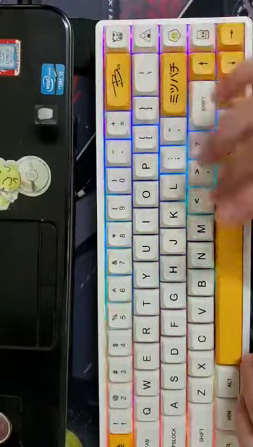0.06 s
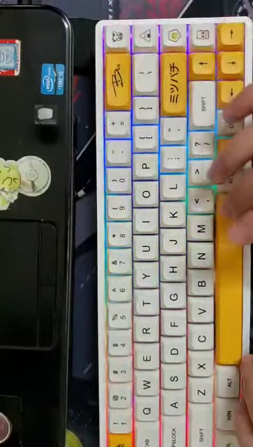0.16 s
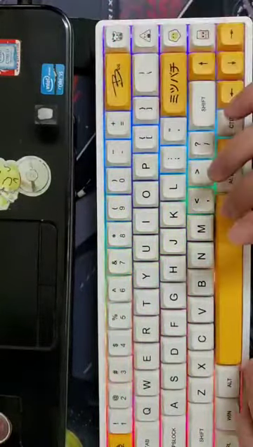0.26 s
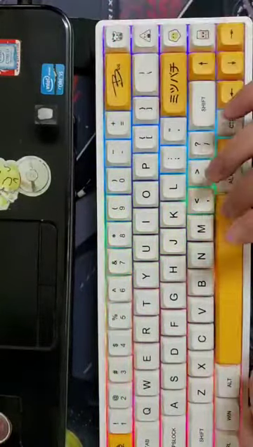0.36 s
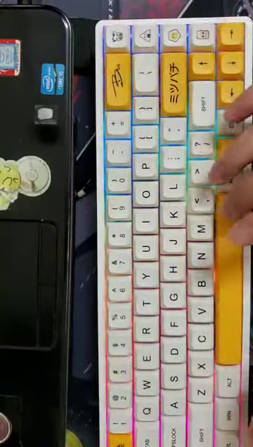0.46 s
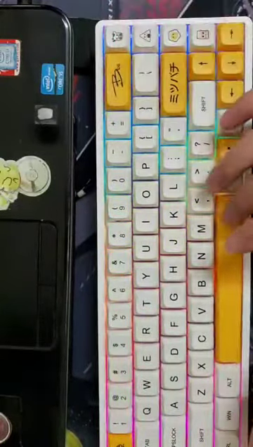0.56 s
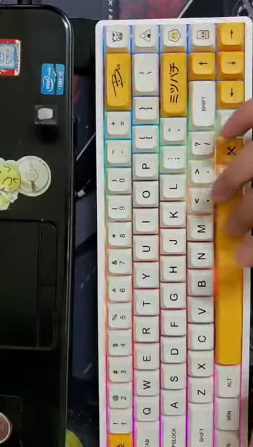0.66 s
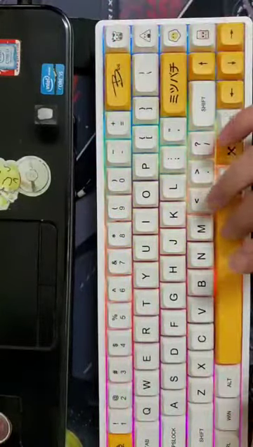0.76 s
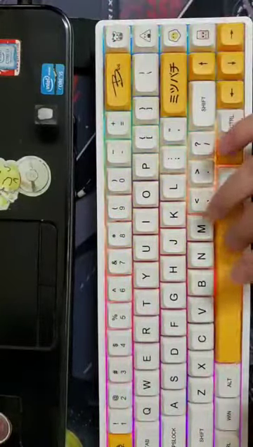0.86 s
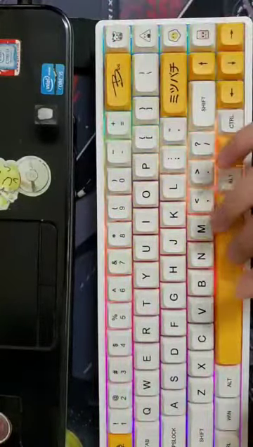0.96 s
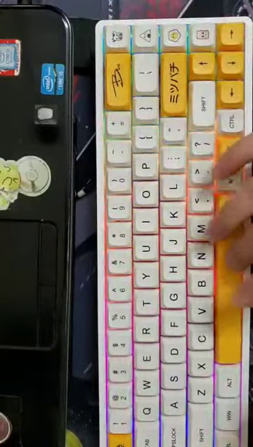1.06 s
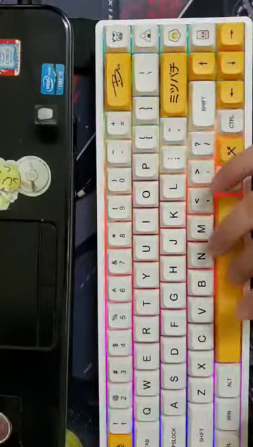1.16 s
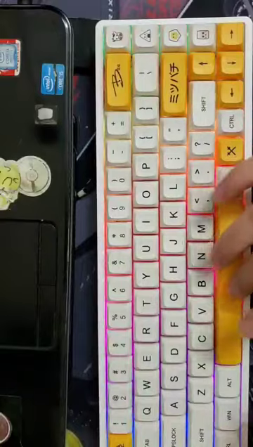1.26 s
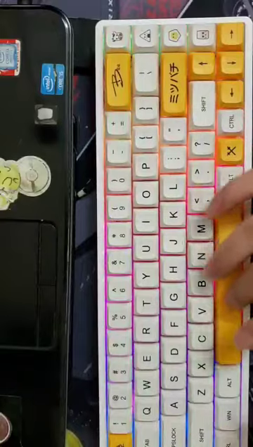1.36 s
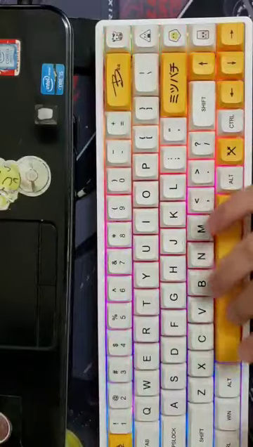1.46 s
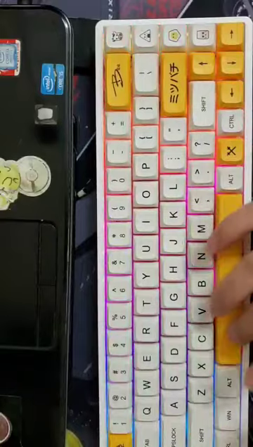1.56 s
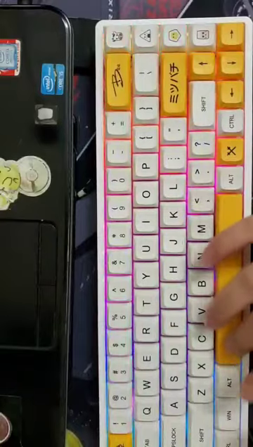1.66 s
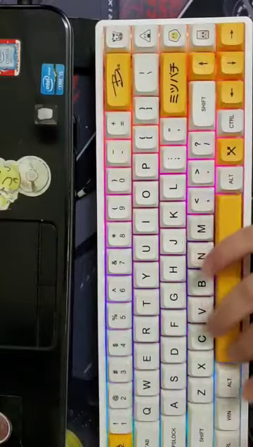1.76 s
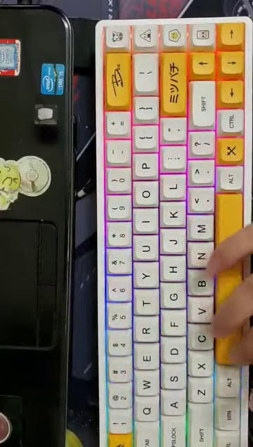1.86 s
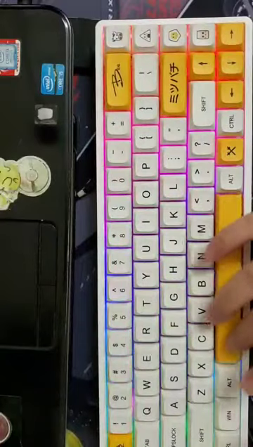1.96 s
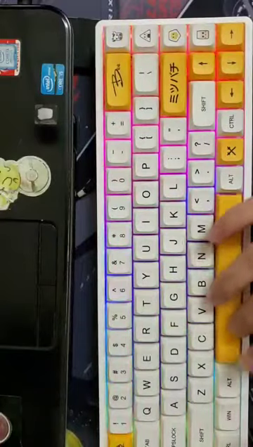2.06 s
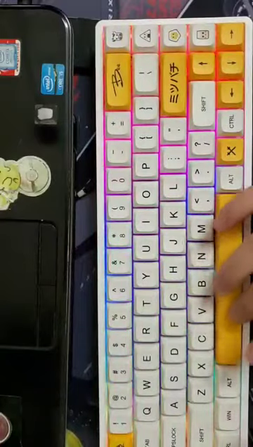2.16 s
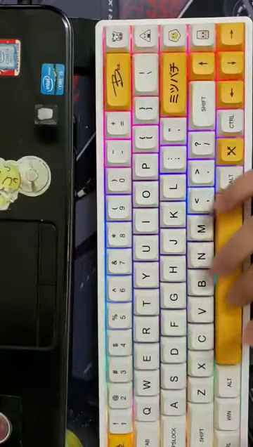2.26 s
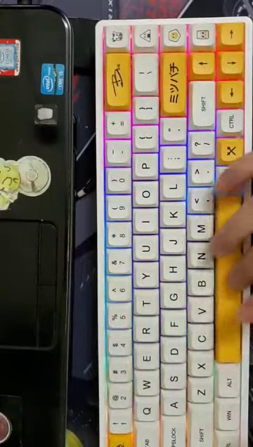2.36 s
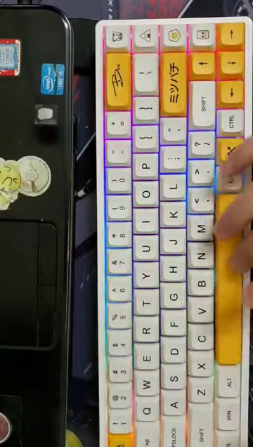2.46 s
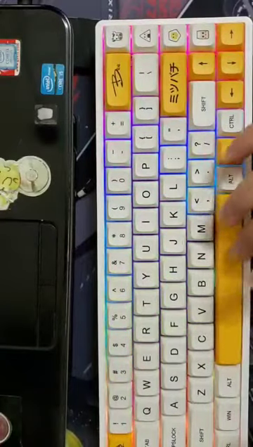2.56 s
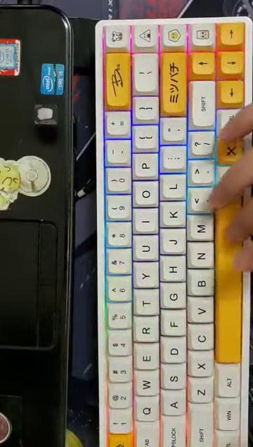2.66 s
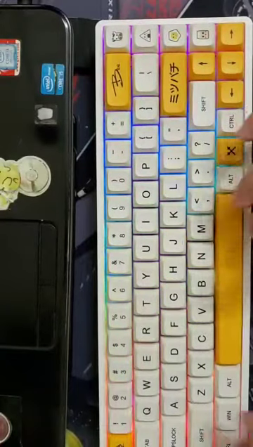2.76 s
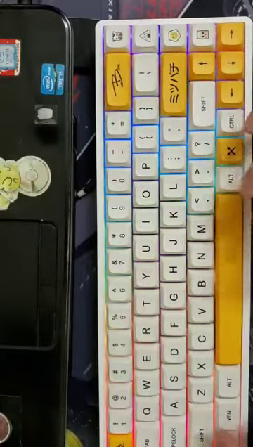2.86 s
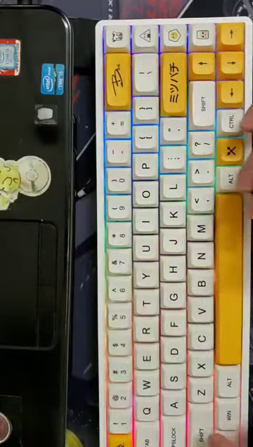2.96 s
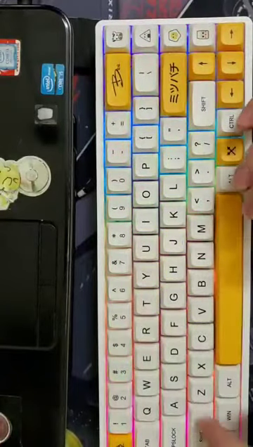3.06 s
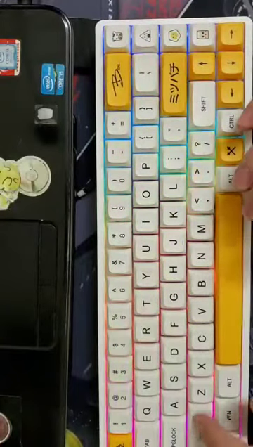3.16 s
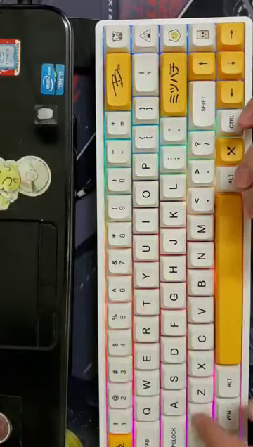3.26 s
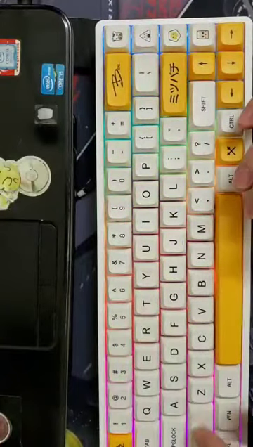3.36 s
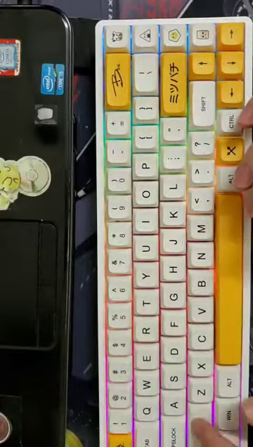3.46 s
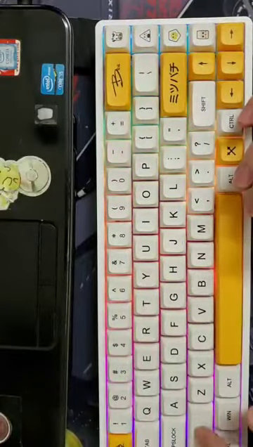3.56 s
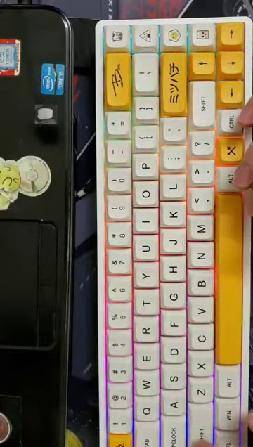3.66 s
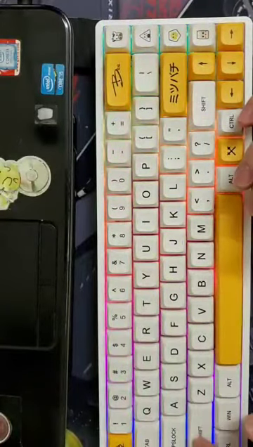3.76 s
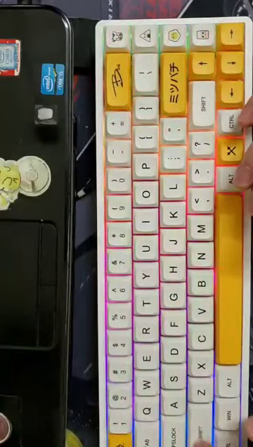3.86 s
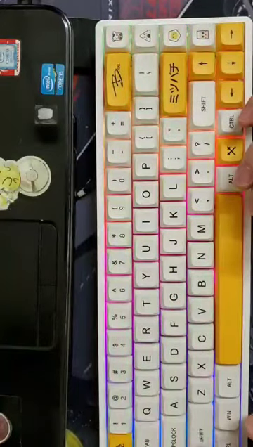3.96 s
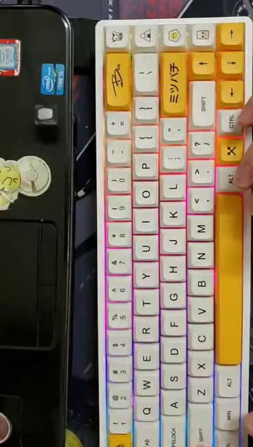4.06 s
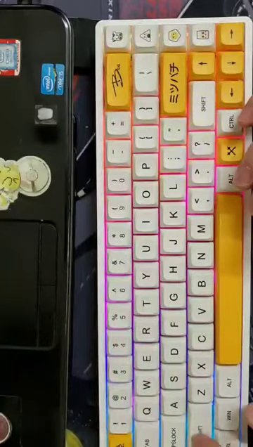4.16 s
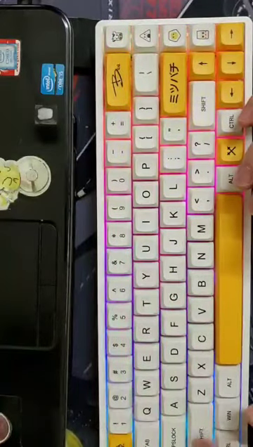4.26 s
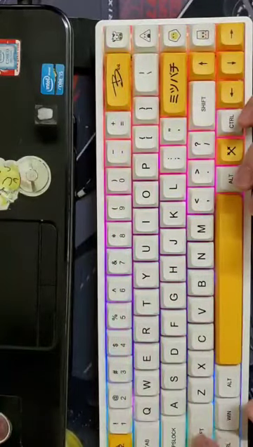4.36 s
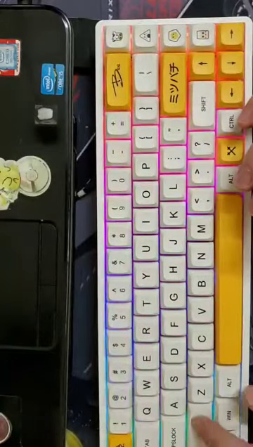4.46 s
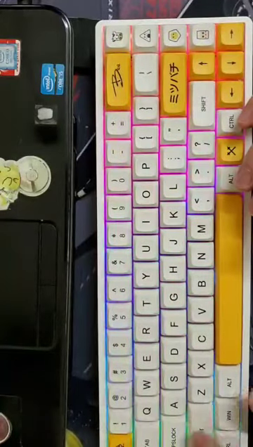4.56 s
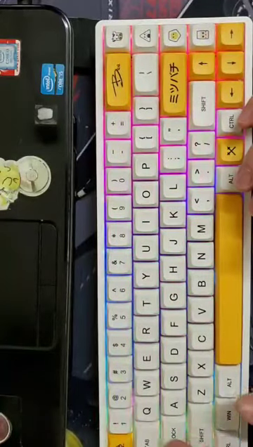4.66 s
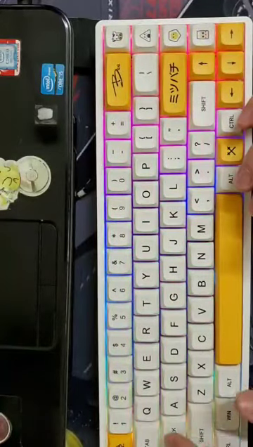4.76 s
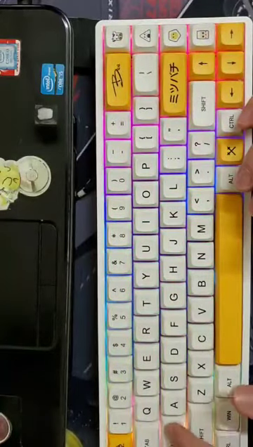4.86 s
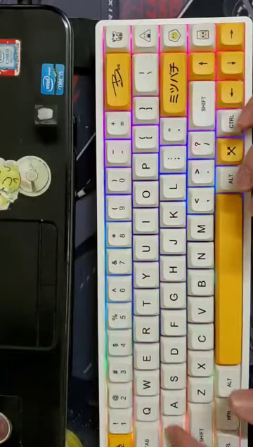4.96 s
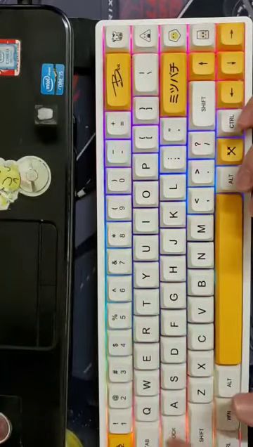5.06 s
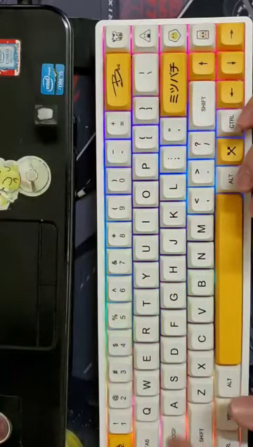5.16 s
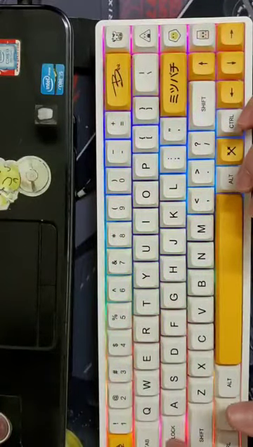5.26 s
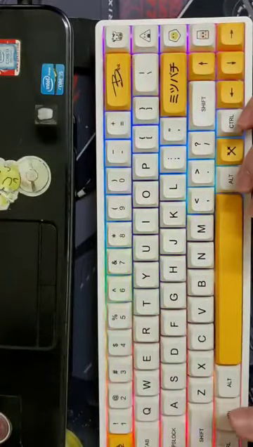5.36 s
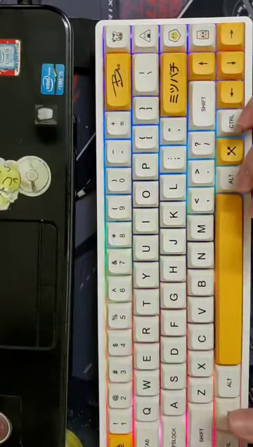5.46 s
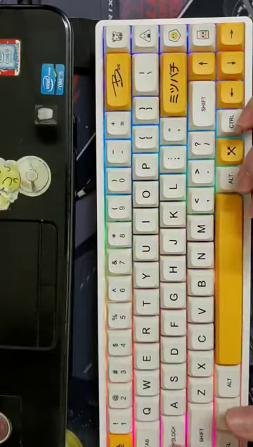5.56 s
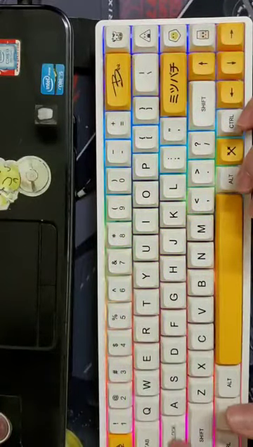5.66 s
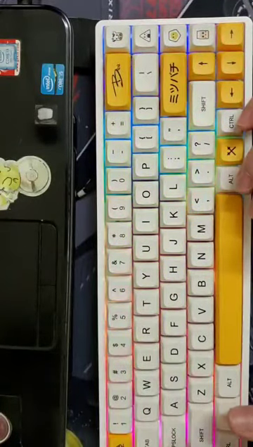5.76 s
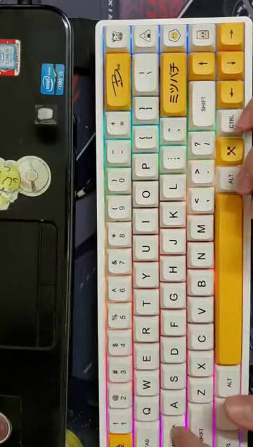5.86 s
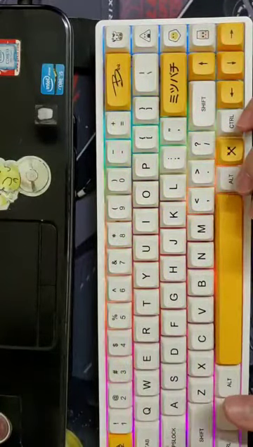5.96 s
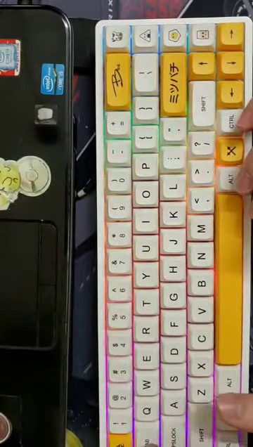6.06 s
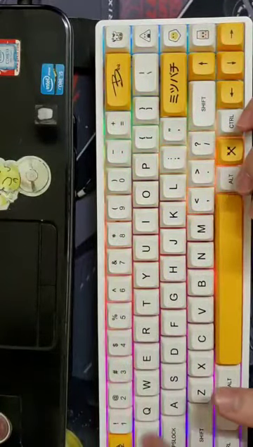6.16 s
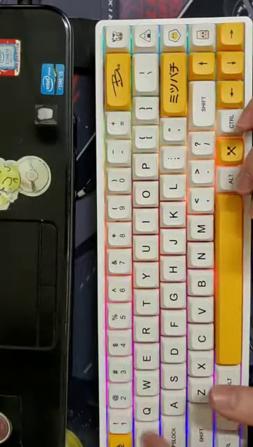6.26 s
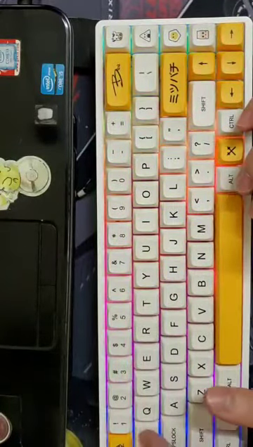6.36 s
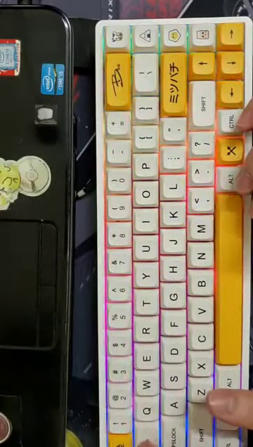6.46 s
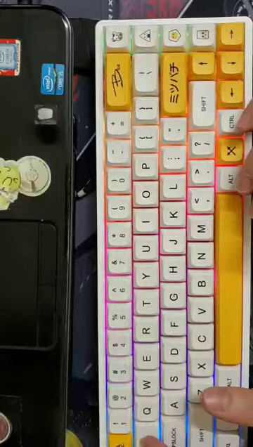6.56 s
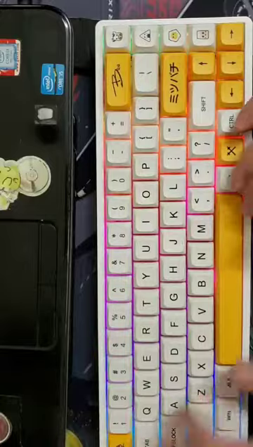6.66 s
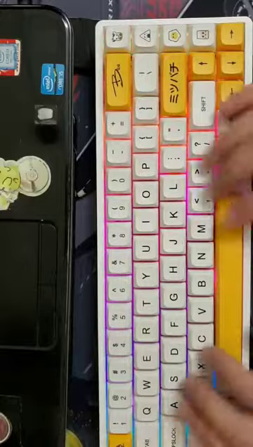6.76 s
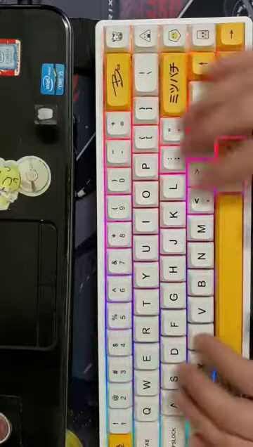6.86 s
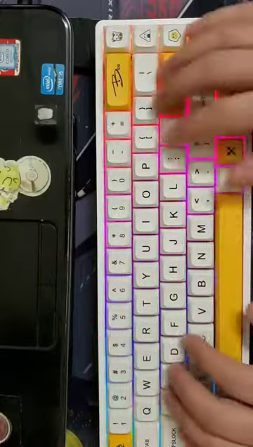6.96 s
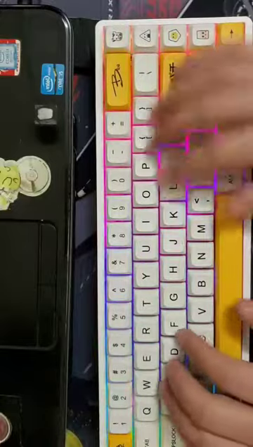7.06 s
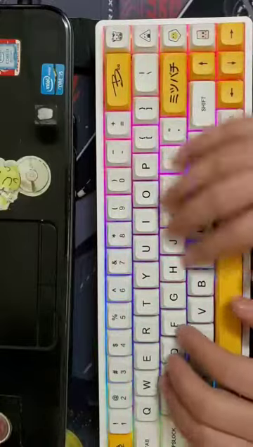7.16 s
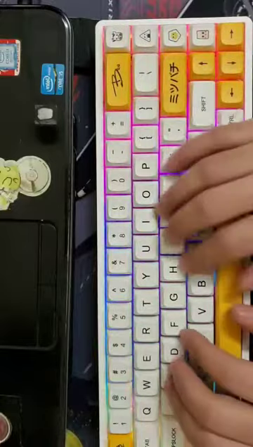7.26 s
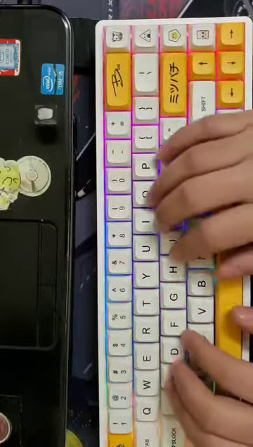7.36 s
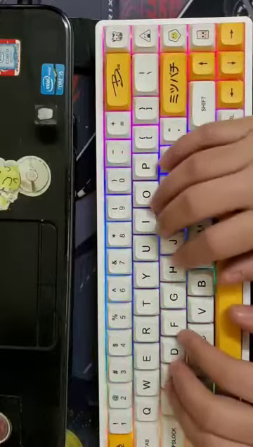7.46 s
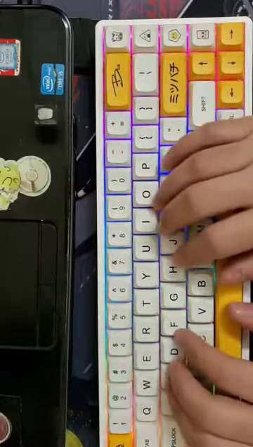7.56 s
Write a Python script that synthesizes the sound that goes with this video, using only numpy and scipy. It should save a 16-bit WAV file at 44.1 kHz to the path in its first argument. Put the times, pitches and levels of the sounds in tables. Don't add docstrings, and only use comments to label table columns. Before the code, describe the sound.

One finger at a time taps mechanical keyboard keys steadily, a deep space bar first, then lighter clacks, ending in soft skin rubs.

```python
import sys
import numpy as np
from scipy import signal
from scipy.fft import rfft, irfft, next_fast_len
from scipy.io import wavfile
from scipy.ndimage import uniform_filter1d, map_coordinates

SR = 44100
rng = np.random.default_rng(int(sys.argv[2]) if len(sys.argv) > 2 else 0)


def gain_from_decibels(decibels):
    exponent = np.asarray(decibels, float) / 20
    return 10 ** exponent


def bounce(signal):
    frames = np.transpose(np.atleast_2d(signal))
    limited = np.clip(frames, -1, 1)
    pcm = np.round(limited * 32767).astype(np.int16)
    wavfile.write(sys.argv[1], SR, pcm)


N = 335160
LENGTH = SR * 3 // 10
LEAD = SR // 50

# [f/Hz, density/dB per Hz]
HUM = [(20, -39.5), (55, -0.5), (79, -14), (108, -8.5), (195, -25), (259, -13.5), (400, -25), (520, -48.5)]
HISS = [(300, -37), (600, -18), (927, -28.5), (1390, -23.5), (2400, -34), (8830, -59.5), (15300, -47),
        (16100, -66)]
HUM_DB, HISS_DB = -58.5, -61
# [f/Hz, correlation]
AIR_ALIKE = [(60, 0.88), (240, 0.82), (950, -0.012), (3770, -0.16), (15000, -0.24)]
# [f/Hz, density/dB per Hz]
OPENING = [
    (0.0, -52, .01, 0.093),
]
OPENING_COLOUR = [(80, -20.0), (130, -4.5), (300, -9.0), (500, -23), (1000, -20), (2200, -7), (3500, -26), (8000, -51)]
OPENING_ALIKE = [(200, 0.9), (3000, 0.19)]  # [f/Hz, correlation]
# [f/Hz, t60/s]
WALLS = [(150, 0.64), (600, 0.33), (2000, 0.21), (5000, 0.39), (12000, 0.28)]
# [delay t/s, level/dB]
ECHOES = [(.0042, -22), (.009, -38), (0.0123, -15.5), (0.016, -45)]

# [f/Hz, density/dB per Hz]
SWAYS = [
    (6.35, -44, .1, 0.17),
    (6.79, -43.5, .12, 0.14),
    (7.05, -50, 0.13, 0.25),
]
SWAY_COLOUR = [(35, -30), (50, 7), (70, -9), (120, -26), (200, -61)]
# [f/Hz, density/dB per Hz]
BRUSHES = [
    (6.7, -71, .003, .04),
    (6.782, -72.5, .02, .075),
    (6.898, -75.5, .04, .09),
    (7.17, -65.5, 0.11, 0.11),
    (7.24, -66.5, 0.11, 0.027),
    (7.338, -84, 0.091, .11),
]
SKIN = [(500, -23), (1200, -9.5), (2500, -21), (3600, -29.5), (7000, -28), (14000, -23.5), (15900, -26),
        (16500, -56.5)]
SKIN_ALIKE = [(700, 0.8), (6000, 0.16)]  # [f/Hz, correlation]
# [f/Hz, level/dB, t60/s]
PALM = [
    (6.769, -45),
    (6.808, -49),
]
PALM_MODES = [(271, 2.5, 0.12), (355, 0.0, 0.099), (525, -9.5, 0.13)]
# [f/Hz, density/dB per Hz]
RUNS = [
    (.5, 2.55, -83),
    (4.87, 6.05, -69),
    (6.27, 6.72, -72.5),
]
CREEP = [(3000, -30), (5000, -6), (9500, -8), (12000, 0.5), (15000, -1), (16300, -30)]

# [f/Hz, level/dB, t60/s]
SPACE_CAP = [(1077, -8, 0.0087), (1690, 5, 0.0073), (2160, -14, 0.0085), (2635, -1, 0.0061),
             (3358, -9, 0.0063), (4090, -25, 0.014)]
WIDE_CAP = [(863, -15, 0.02), (1277, -15, 0.038), (1713, 4.5, 0.0072), (2150, 1, 0.0074),
            (2614, -2, 0.0041), (3260, -20, 0.0086)]
CORNER_CAP = [(870, -2, 0.021), (1250, -8.5, 0.029), (1674, 13, 0.0077), (1786, 9.5, 0.017),
              (2130, -1.5, 0.023), (2605, 8.5, 0.0061), (3045, -5, 0.011), (4280, -12, 0.0053),
              (1515, 2.5, 0.0071)]
LAST_CAP = [(964, -12.5, 0.026), (1273, -12, 0.025), (1715, -2.5, 0.01), (2204, 1.5, 0.0092),
            (2550, 1, 0.012), (3010, 1, 0.009), (3990, -4, 0.006)]
# [f/Hz, level/dB, t60/s]
PLATE = [(876.3, -17.5, 0.058), (1266, -30, 0.098), (1800, -27, 0.024), (1983, -54, 0.21),
         (2580, -46, 0.15)]
CASE = [(282.8, -17, 0.21), (336.4, -11, 0.096), (442.5, 3.5, 0.054), (538.6, 3, 0.048),
        (619.6, -1.5, 0.066)]
DESK = [(56.6, -7, 0.38), (76.3, 3, .11), (106.5, 4.5, 0.2), (146.5, 2.5, 0.34)]
# [f/Hz, level/dB, t60/s]
SPACE_SPRING = [(3280, -54, 0.15), (5060, -49, 0.039), (7700, -58.5, 0.041)]
WIDE_SPRING = [(5580, -55, 0.025), (8000, -84, 0.037)]
CORNER_SPRING = [(5160, -31.5, 0.015), (7150, -37, 0.022), (7590, -52, 0.17), (7840, -42, 0.032),
                 (11930, -43.5, 0.025)]
LAST_SPRING = [(6120, -41.5, 0.05), (8600, -61, .03)]
# [f/Hz, level/dB]
SPACE_CRACK = [(2000, -10), (3200, -0.5), (4500, -0.5), (6500, -4), (10000, -16.5), (13000, -18),
               (16500, -41.5)]
WIDE_CRACK = [(2000, -2.5), (3800, 2.5), (5500, -0.5), (8000, -4.5), (11000, -7.5), (13000, -21),
              (16500, -60)]
CORNER_CRACK = [(2000, 4), (3500, 3), (5000, 2.5), (7500, 1.5), (11000, -3.5), (13500, -6.5), (16500, -24)]
# [f/Hz, level/dB]
SCRAPE = [(200, -0.5), (700, 3.5), (2000, -1.5), (4000, -9.5), (9000, -30), (16000, -19.5)]
SPRAY = [(2500, -5), (3500, 3.5), (4450, -9), (5100, -2), (7500, -10), (9500, -17.5), (12500, -11),
         (16500, -25.5)]
# [left lag/samples, plate/dB, room/dB, treble spray/dB, deep desk modes/dB, upper case modes/dB,
# release rebound t/s]
KEY_TRAITS = [
    (-3, -2.5, -9.5, 3, 3.5, 0.5, 0.00201),
    (7, -6, -6.5, -8.5, -6.5, -8, 0.00279),
    (26, -6, -5, -3.5, 1.5, -9.5, 0.00328),
    (7.5, -2.5, -4.5, -3, 7.5, -13, 0.00297),
    (5.5, 5.5, -4.5, -8, -21, -2, 0.00314),
]
# [desk/dB, case/dB, case per clack/dB per dB, desk per snap/dB per dB, left-right/dB]
PRESS = [
    (-7, -4.5, -0.64, 0.32, 5),
    (-22.5, -22.5, -1, 0.16, 16.5),
    (-25, -31, 0, 0.8, 15),
    (-25, -32.5, -.5, 0.2, 5.5),
]
# [desk/dB, case/dB, case per clack/dB per dB, snap/dB, left-right/dB]
RELEASE = [
    (-17, -4, 0, -30, 4.5),
    (-34, -24, -0.4, -33.5, 8),
    (-32.5, -25.5, -0.5, -17, 7.5),
    (-29.5, -23, -0.7, -14.5, 5.5),
]
# [press t/s, press level/dB, snap re clack/dB, release t/s, release level/dB]
SPACE_STROKES = [(.442, -17.5, -27.5, .5165, -23.5), (.5954, -14, -22, .6688, -22.5),
                 (0.763, -14.5, -20.5, .8361, -28.5), (0.9097, -16, -20, .979, -22.5),
                 (1.0714, -14.5, -21.5, 1.1374, -25), (1.218, -14.5, -22.5, 1.2833, -24.5),
                 (1.3674, -11.5, -23, 1.4302, -26.5), (1.5107, -12.5, -18.5, 1.5728, -23),
                 (1.667, -11.5, -20.5, 1.7285, -21.5), (1.8158, -9.5, -21, 1.8863, -23),
                 (1.9769, -12, -21, 2.0406, -27), (2.1137, -11, -21, 2.1824, -27.5),
                 (2.261, -13.5, -15.5, 2.322, -28), (2.4017, -13, -23.5, 2.4565, -25),
                 (2.548, -16.5, -20.5, 2.591, -23.5), (2.7054, -23.5, -31.5, 2.749, -27.5)]
WIDE_STROKES = [(3.1595, -25.5, -18, 3.2272, -24.5), (3.3244, -21, -12, 3.3928, -25),
                (3.4868, -20, -11.5, 3.5551, -17.5), (3.6386, -16.5, -44, 3.6998, -18.5),
                (3.7853, -19.5, -18.5, 3.8404, -18.5), (3.9231, -19, -15.5, 3.9861, -23.5),
                (4.053, -21, -32, 4.1229, -26), (4.2029, -20.5, -22, 4.2626, -22),
                (4.3544, -25, -31, 4.4071, -16.5), (4.497, -19, -13.5, 4.5742, -29.5)]
CORNER_STROKES = [(4.8714, -17.5, -15.5, 4.9483, -22.5), (5.0405, -18.5, -25, 5.111, -22.5),
                  (5.1883, -13, -12.5, 5.2572, -20.5), (5.3434, -17.5, -12.5, 5.4091, -25.5),
                  (5.487, -18.5, -20, 5.5418, -24.5), (5.6186, -18, -14, 5.6811, -24),
                  (5.7534, -14.5, -18, 5.8151, -20.5), (5.909, -19, -10.5, 5.9903, -24)]
LAST_STROKES = [
    (6.2758, -25, -11, 6.349, -21.5),
    (6.4382, -24.5, -10, 6.4965, -26),
    (6.5774, -16.5, -6, 6.6577, -25.5),
]
# [t/s, level/dB, snap/dB]
TOUCHES = [(2.685, -43, -16), (3.136, -47.5, -36), (5.469, -42.5, -5), (5.603, -44, -17.5),
           (5.898, -35, -14), (6.2592, -41, -14), (7.0567, -55, -22), (7.1557, -49, -22),
           (7.199, -42.5, -27), (7.2147, -44, -32), (7.3173, -56, -25), (3.8406, -34.5, -4),
           (3.9862, -39, -3)]
TOUCH_DESK_DB, TOUCH_CASE_DB, TOUCH_PAN_DB = -22, -11.5, 2.5

USUAL_DB = -20
DESK_FOLLOWS, RELEASE_DESK_FOLLOWS, SNAP_GROWS = -1.05, -1.02, 0.92
SNAP_CARRIES = 0.19
RELEASE_DEEP_DB = -4.5
EASES_DB_PER_S = -1.7


def unit(x):
    return x / np.sqrt(np.mean(x ** 2) + 1e-20)


def peak_one(x):
    return x / np.max(np.abs(x))


def along(points, hz):
    f, v = np.transpose(points)
    return np.interp(np.log(hz + 1), np.log(f + 1), v)


def filtered(x, response):
    m = next_fast_len(x.shape[-1] + 4096)
    return irfft(rfft(x, m) * response(np.fft.rfftfreq(m, 1 / SR)), m)[..., :x.shape[-1]]


def coloured(x, spectrum):
    return filtered(x, lambda hz: gain_from_decibels(along(spectrum, hz)))


def hiss(spectrum, alike):
    def mid_side(hz):
        turn = np.arccos(np.clip(along(alike, hz), -1, 1)) / 2
        return gain_from_decibels(along(spectrum, hz)) * [np.cos(turn), np.sin(turn)]

    mid, side = filtered(rng.standard_normal((2, N)), mid_side)
    return unit(np.array([mid + side, mid - side]))


def swells(rows):
    t = np.arange(N) / SR
    return sum(gain_from_decibels(db - 20 * np.maximum((s - t) / rise, (t - s) / fall)) for s, db, rise, fall in rows)


def ring(modes, attack, scatter_db, detune, delay=0):
    hz, db, t60 = np.transpose(modes)[:, :, None]
    chance = rng.standard_normal((2, len(modes), 1))
    t = np.maximum(np.arange(LENGTH) / SR - abs(delay), 0)
    sign = (-1) ** np.arange(len(modes))[:, None]
    decay = gain_from_decibels(db + scatter_db * chance[0] - 60 * t / t60)
    waves = sign * decay * np.sin(2 * np.pi * hz * (1 + detune * chance[1]) * t)
    return waves.sum(0) * (1 - np.exp(-(t / attack) ** 2))


def rattle(modes, rough):
    out = np.zeros(LENGTH)
    for mode in modes:
        flutter = 1 + rough * unit(uniform_filter1d(rng.standard_normal(LENGTH), size=60))
        out += flutter * ring([mode], 0.001, 1.5, 0.003)
    return out


def air():
    hum = gain_from_decibels(HUM_DB) * hiss(HUM, AIR_ALIKE)
    faint_hiss = gain_from_decibels(HISS_DB) * hiss(HISS, AIR_ALIKE)
    return hum + faint_hiss + swells(OPENING) * hiss(OPENING_COLOUR, OPENING_ALIKE)


def room(x):
    hz, t, z = signal.stft(rng.standard_normal((2, LENGTH)), SR, nperseg=256)
    share = np.clip(hz / 2500, 0, 1)[:, None]
    z[1] = np.sqrt(1 - share ** 2) * z[0] + share * z[1]
    envelope = gain_from_decibels(-60 * t / along(WALLS, hz)[:, None]) * (1 - np.exp(-t / 0.00085))
    tail = signal.istft(z * envelope, SR, nperseg=256)[1][:, :LENGTH]
    return signal.fftconvolve(x[None], tail / np.linalg.norm(tail[0]), axes=1)[:, :LENGTH]


def early_echoes(x):
    return sum(gain_from_decibels(db + rng.normal(0, 0.67)) * np.roll(x, round(d * SR)) for d, db in ECHOES)


def ports(x, lag, pan_db):
    sign = np.array([[0.5], [-0.5]])

    def response(hz):
        high = hz ** 2 / (hz ** 2 + 1900 ** 2)
        shade = gain_from_decibels(sign * pan_db * 1.07 * high ** 2 / (1 + (hz / 11500) ** 6))
        return shade * np.exp(-2j * np.pi * hz * sign * lag * high / SR)

    return filtered(x, response)


def hands():
    rub = swells(BRUSHES) * hiss(SKIN, SKIN_ALIKE) * gain_from_decibels(9.0)
    sway = swells(SWAYS) * hiss(SWAY_COLOUR, [(50, 1.0)])
    knocks = np.zeros(N + LENGTH)
    for s, db in PALM:
        knocks[round(s * SR):][:LENGTH] += gain_from_decibels(db) * ring(PALM_MODES, 0.0018, 1.7, 0.014)
    return rub + sway + knocks[:N]


def creep():
    t = np.arange(N) / SR
    steps = sum(gain_from_decibels(db) * ((t > start) & (t < end)) for start, end, db in RUNS)
    gate = uniform_filter1d(steps, size=2000)
    uneven = map_coordinates(rng.standard_normal(200), [t * 25])
    return gate * gain_from_decibels(3 * uneven) * hiss(CREEP, [(6000, 0.2)])


def desk_thump(desk_db, deep_db, release):
    deep = deep_db + RELEASE_DEEP_DB * release
    wood = [(hz, db + deep * (hz < 125), t60) for hz, db, t60 in DESK]
    return gain_from_decibels(desk_db + 1.5) * peak_one(ring(wood, 0.0018, 1.8, 0.012, delay=0.0042))


def case_knock(case_db, upper_db):
    shell = [(hz, db + upper_db * (hz > 480), t60) for hz, db, t60 in CASE]
    return gain_from_decibels(case_db + 1) * peak_one(ring(shell, 0.00072, 1.22, 0.022, delay=0.0004))


def spring_ring(coil, db, release):
    return gain_from_decibels(-db - 4 - 6 * (1 - release)) * rattle(coil, rough=0.7)


def stem_scrape(db, release):
    travel = np.arange(LEAD) / LEAD
    landing = 1 / (1 + np.exp((0.5 - travel) / 0.064))
    swell = gain_from_decibels(db - 31.0 - 1.8 * release) * landing * (0.7 + 0.41 * travel)
    return swell * unit(coloured(rng.standard_normal((2, LEAD)), SCRAPE))


def stem_crack(colour, crack_db, release):
    t = np.arange(LENGTH) / SR
    noise = rng.standard_normal((2, LENGTH))
    noise[1] = 0.33 * noise[0] + 2.15 * noise[1]
    burst = noise * gain_from_decibels(-60 * t / (0.0053 + 0.002 * release)) * (1 - np.exp(-(t / 0.0004) ** 2))
    burst += 4.13 * (1 - release) * (np.arange(LENGTH) == [[26], [27]])
    return gain_from_decibels(crack_db + 16.0) * peak_one(coloured(burst, colour))


def wall_spray(level_db):
    blow = np.arange(LENGTH) == 26
    return gain_from_decibels(level_db) * peak_one(coloured(blow, SPRAY))


def cap_clack(cap, plate_db, rebound, release):
    clack = peak_one(ring(cap, 0.0014, 2.1, 0.022)) + gain_from_decibels(plate_db) * rattle(PLATE, rough=0.44)
    return clack + release * gain_from_decibels(-4) * peak_one(ring(cap, 0.0006, 3, 0.03, delay=rebound))


def contacts(strokes, press, release):
    down_desk, down_case, down_follows, weight, down_pan = press
    up_desk, up_case, up_follows, up_crack, up_pan = release
    rows = []
    for down_s, down_db, snap_db, up_s, up_db in strokes:
        crisp = snap_db - USUAL_DB
        more = down_db - USUAL_DB
        eased = EASES_DB_PER_S * (down_s - strokes[0][0])
        desk_db = down_desk + eased + DESK_FOLLOWS * more + weight * crisp
        rows.append((down_s, down_db, desk_db, down_case + down_follows * more, snap_db, down_pan))
        more = up_db - USUAL_DB
        desk_db = up_desk + RELEASE_DESK_FOLLOWS * more
        crack_db = up_crack + SNAP_GROWS * more + SNAP_CARRIES * crisp
        rows.append((up_s, up_db, desk_db, up_case + up_follows * more, crack_db, up_pan))
    return rows


def key(hits, cap, colour, coil, traits):
    lag, plate_db, room_db, spray_db, deep_db, upper_db, rebound = traits
    out, t = np.zeros((2, N + LENGTH + SR)), np.arange(LENGTH) / SR
    for k, (s, db, desk_db, case_db, crack_db, pan_db) in enumerate(hits):
        release = k % 2
        clack = cap_clack(cap, plate_db, rebound, release)
        crack = stem_crack(colour, crack_db, release)
        spring = spring_ring(coil, db, release)
        case = case_knock(case_db, upper_db)
        desk = desk_thump(desk_db, deep_db, release)
        spray = wall_spray(spray_db + 0.37 * crack_db + 4.5)
        answer = clack * gain_from_decibels(3.5 - 60 * t / 0.014) + case * gain_from_decibels(-60 * t / 0.077)
        direct = ports(clack + spring + crack + early_echoes(answer), lag, pan_db)
        low = np.array([gain_from_decibels(0.8) * (np.roll(desk, 10) + np.roll(case, -5)), desk + case])
        reverb = gain_from_decibels(room_db) * room(answer + spray + spring / 10)
        start = round((s - 0.0003) * SR)
        out[:, start:start + LENGTH] += gain_from_decibels(db + 3.5) * (direct + low + reverb)
        out[:, start - LEAD:start] += stem_scrape(db, release)
    return out[:, :N]


def scene():
    strokes = (SPACE_STROKES, WIDE_STROKES, CORNER_STROKES, LAST_STROKES)
    hits = [contacts(*k) for k in zip(strokes, PRESS, RELEASE)]
    hits.append([(s, db, TOUCH_DESK_DB, TOUCH_CASE_DB, snap_db, TOUCH_PAN_DB) for s, db, snap_db in TOUCHES])
    caps = (SPACE_CAP, WIDE_CAP, CORNER_CAP, LAST_CAP, WIDE_CAP)
    cracks = (SPACE_CRACK, WIDE_CRACK, CORNER_CRACK, CORNER_CRACK, CORNER_CRACK)
    springs = (SPACE_SPRING, WIDE_SPRING, CORNER_SPRING, LAST_SPRING, WIDE_SPRING)
    keys = sum(key(*k) for k in zip(hits, caps, cracks, springs, KEY_TRAITS))
    return air() + hands() + creep() + keys


def low_pass(x):
    return signal.sosfilt(signal.butter(12, 16650, fs=SR, output="sos"), x)


def record(dry):
    band = filtered(dry, lambda hz: (hz < 16600) * hz ** 2 / (hz ** 2 + 30 ** 2))
    return low_pass(band)


dry = scene()
out = record(dry)
bounce(out)
```